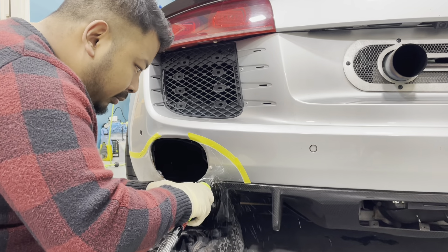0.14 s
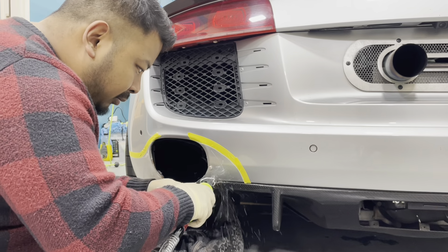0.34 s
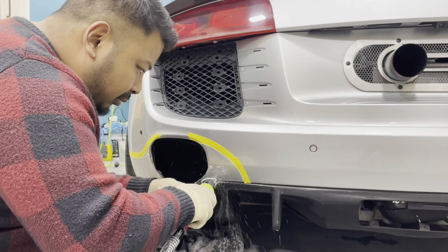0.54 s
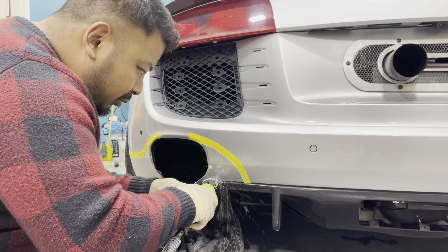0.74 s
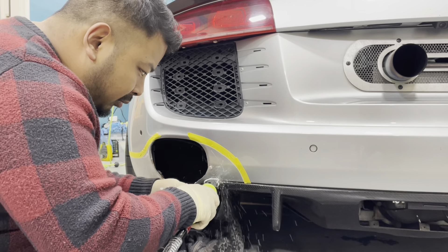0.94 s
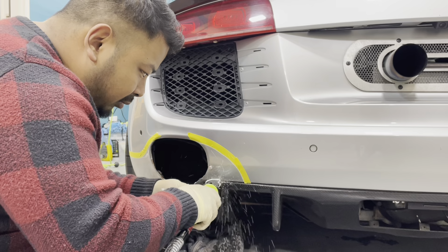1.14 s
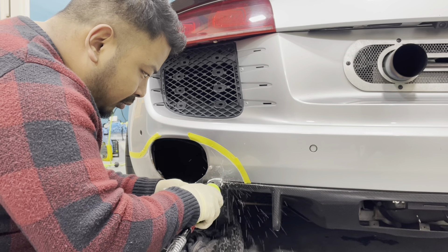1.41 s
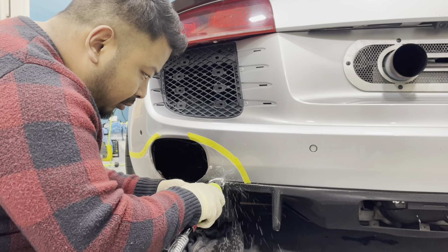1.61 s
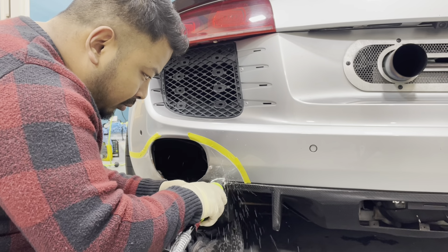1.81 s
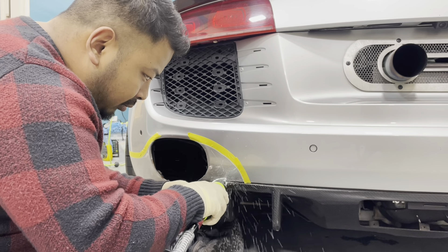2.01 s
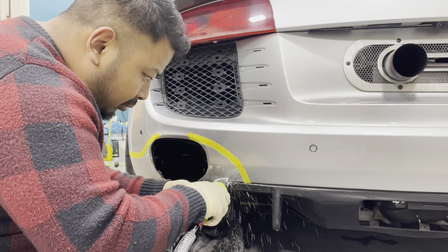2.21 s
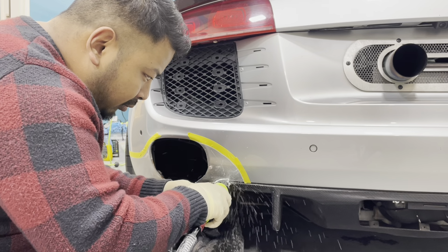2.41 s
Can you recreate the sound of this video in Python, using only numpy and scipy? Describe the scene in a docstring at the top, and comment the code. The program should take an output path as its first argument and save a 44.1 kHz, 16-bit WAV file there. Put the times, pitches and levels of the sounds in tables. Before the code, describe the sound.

A pneumatic saw cuts plastic with a rapid buzz, hissing air and a rough growl.

```python
"""In a workshop, a metre or two away, an air saw cuts a plastic bumper at about 190 strokes a second.
Each stroke hums and makes the panel ring. Pressed hard, the blade bites on every other stroke and
growls an octave lower. Exhaust air and chips hiss, puffing once a stroke. Two microphone openings,
left and right, hear it all with a small lag between them."""
import sys
import numpy as np
from scipy import signal
from scipy.fft import rfft, irfft, next_fast_len
from scipy.io import wavfile
from scipy.ndimage import uniform_filter1d

SR = 44100
rng = np.random.default_rng(int(sys.argv[2]) if len(sys.argv) > 2 else 0)


def dump(signal):
    """Clip the signal to [-1, 1] and save it as 16-bit WAV at the path in sys.argv[1]."""
    limited = np.clip(np.atleast_2d(signal).T, -1, 1)
    pcm = np.round(limited * 32767).astype(np.int16)
    wavfile.write(sys.argv[1], SR, pcm)


N = 112454
TIME = np.arange(N) / SR

# How fast the saw strokes and how loud it hums: t/s, stroke rate/Hz, level/dB
STROKE_HUM = [(0.06, 184.6, -20.9), (0.18, 186.4, -19.8), (0.31, 188.9, -18.5), (0.45, 190.1, -17.5),
              (0.66, 190.9, -18), (0.77, 193.3, -18.9), (1.2, 195.4, -19.5), (1.48, 196.3, -19.6),
              (1.6, 195.5, -20.5), (1.65, 194.2, -20), (1.7, 196.4, -20), (1.75, 193.8, -20),
              (1.83, 195.4, -20), (1.92, 193.1, -19.5), (2.0, 194.5, -20.2), (2.07, 192.6, -19),
              (2.14, 192.9, -19.5), (2.24, 194.3, -20), (2.32, 196.4, -20), (2.38, 194.8, -19.5),
              (2.48, 195.1, -19)]


def undb(db):
    """Turn decibels into a gain."""
    return 10 ** (np.asarray(db) / 20)


def over_time(rows, col=1):
    """Join the points of a table column into a signal over time."""
    rows = np.array(rows, float)
    return np.interp(TIME, rows[:, 0], rows[:, col])


def over_frequency(rows, hz, log=True):
    """Read a table of (frequency, value) at hz."""
    freqs, values = np.array(rows, float).T
    return np.interp(np.log(hz + 1), np.log(freqs + 1), values) if log else np.interp(hz, freqs, values)


def wander(rate_hz, count=1):
    """Rows of smooth random drift, about 1 in size."""
    hold = max(int(SR / rate_hz), 2)
    steps = np.repeat(rng.standard_normal((count, 2000))[:, :N // hold + 1], hold, axis=1)
    return 1.46 * uniform_filter1d(uniform_filter1d(steps, hold), hold)[:, :N]


def filtered(x, gain):
    """Filter x by a gain given for every frequency."""
    size = next_fast_len(N)
    freqs = np.arange(size // 2 + 1) * SR / size
    return irfft(rfft(x, size) * gain(freqs), size)[..., :N]


def panel_shudder(bite, centre_hz=55, level_db=-68):
    """The panel shakes with a faint rumble when the blade bites."""
    rumble = filtered(rng.standard_normal(N), lambda f: np.exp(-(np.log((f + 1) / centre_hz) / .3) ** 2))
    return bite * undb(level_db) * rumble / rumble.std()


def air_sizzle(centre_hz=10040, width_hz=220, level_db=-56, full_at_s=1.27):
    """A thin, high sizzle fades into the air hiss."""
    sizzle = filtered(rng.standard_normal(N), lambda f: np.exp(-((f - centre_hz) / width_hz) ** 2))
    fade_in = np.clip(10 * (TIME - full_at_s) + 1, 0, 1)
    return fade_in * undb(level_db + 2 * wander(10)[0]) * sizzle / sizzle.std()


def air_and_chips(phase, bite, rasp_top_hz=4300):
    """Exhaust air and chips hiss; the treble puffs with each stroke and crackles."""
    # Base tone colour of the hiss: f/Hz, level in each hertz/dB
    spectrum = [(30, -98), (60, -90), (130, -82), (250, -76.5), (500, -84), (1000, -75), (2000, -73),
                (2700, -75), (3400, -77.5), (4200, -74), (7500, -73.5), (10000, -73), (12500, -79),
                (16000, -79.5)]
    # Slow rise and fall of the treble: t/s, change/dB
    treble_swell = [(0, 1.5), (.3, -2), (1., 0.5), (1.5, 0), (2.5, -2)]
    # The blade scrapes as it catches: middle t/s, length/s, lift/dB
    scrapes = [(0.185, 0.29, 3), (2.08, .05, 1), (2.266, 0.045, 1.5), (2.369, 0.042, 2)]
    scrape_db = sum(db * np.exp(-(2 * (TIME - middle) / length) ** 2) for middle, length, db in scrapes)
    rasp_db = 4.5 * bite ** .25  # harder biting, more rasp
    hiss = np.zeros(N)
    for hz in 30 * 2 ** np.arange(0, 9.5, .5):  # bands half an octave apart
        treble = np.clip(hz / 3000, 0, 1)
        puff_db = 2.5 * np.sin(phase + 2 * rng.standard_normal()) + bite * np.sin(phase / 2)
        flicker_db = (1 - treble / 2) * wander(15)[0]
        crackle_db = 1.2 * wander(700)[0]
        db = flicker_db + treble * (puff_db + crackle_db + over_time(treble_swell))
        if hz < rasp_top_hz:
            db += rasp_db + min(hz / 1000, 1) * scrape_db
        hump = lambda f: np.cos(np.pi * np.clip(np.log2((f + 1) / hz), -.5, .5))
        noise = filtered(rng.standard_normal(N), lambda f: hump(f) * undb(over_frequency(spectrum, f)))
        hiss += undb(db) * noise
    return hiss * np.sqrt(SR / 2)


def ringing_db(k):
    """The tone at k times the stroke rate rings up or drops away for a while."""
    # Passing swells and dips: start t/s, length/s, multiple of the stroke rate, change/dB
    swells = [(0, .24, 11, 9), (.3, .25, 21, 7), (.52, .24, 4, -8), (.74, .42, 7, 3), (.5, .22, 24, -11),
              (.7, .62, 17, 5), (.76, .42, 15, 5), (1.2, .4, 15, -7), (1.1, .32, 2, -4), (1.44, .22, 12, 6),
              (1.67, .2, 12, -5), (.55, .13, 11, 5), (2.39, .2, 20, 4), (.3, .2, 23, 4), (.25, .22, 4, 4),
              (.56, .16, 3, -4), (.3, .35, 14, 9), (.68, .2, 16, 6), (.7, .85, 10.5, -8),
              (2.22, .17, 3, -2), (2.07, .32, 10.5, -5), (1.58, .16, 14.5, 10), (1.58, .16, 13.5, 9),
              (2.1, .45, 15, -6), (.28, .25, 16, 7), (2.2, .35, 12, -6), (.72, .45, 20, 4),
              (2.22, .17, 14, -9), (1.3, .3, 21, -5)]
    edge_s = .02
    return sum(db * np.clip(np.minimum(TIME - start, start + length - TIME) / edge_s + .5, 0, 1)
               for start, length, multiple, db in swells if round(2 * multiple) == 2 * k)


def panel_tone(phase, k, db, waver):
    """One tone at k times the stroke rate; its level and timing waver as the panel flexes."""
    level_drift, phase_drift = waver * wander(8, count=2)
    patchy_db = 2.5 * (k > 12) * wander(14)[0]  # high tones come and go
    gain = undb(db + ringing_db(k) + patchy_db) * np.sqrt(2) * np.abs(1 + level_drift)
    offset = (.5 + .25 * k) * rng.standard_normal()  # blurs the sharp pulse of each stroke
    return -gain * np.cos(k * phase + offset + 2 * phase_drift)


def saw_blade(phase, bite):
    """Strokes hum and ring the panel; biting on every other one adds growling tones in between."""
    # How far the blade is sunk in the cut: t/s, depth from 0 to 1
    cut_depth = [(.06, 0.31), (.5, 0.26), (.8, 0.49), (1.05, 0.94), (1.6, 1), (2.48, 0.75)]
    # Extra level at five times the stroke rate: t/s, change/dB
    fifth_lift = [(.06, 4.5), (.3, 0), (.68, -9.5), (.8, -3.5), (1.04, -14), (1.16, -4), (2.1, 0),
                  (2.3, 5.5), (2.48, 0.5)]
    # Base levels, one row per multiple of the stroke rate, from 1:
    # blade shallow/dB, sunk/dB, biting/dB, growl half a multiple lower/dB
    overtones = [(-19, -20, -20, -48.5), (-26.5, -35.5, -35.5, -32), (-23.5, -28.5, -24, -53.5),
                 (-33.5, -34, -35, -39.5), (-31, -27, -32.5, -36.5), (-28, -23.5, -33, -32.5),
                 (-26, -33, -38, -35.5), (-40.5, -36.5, -49, -35), (-27.5, -26, -31.5, -33),
                 (-29.5, -37, -35, -38), (-34.5, -44, -44, -33), (-41.5, -31.5, -31, -38.5),
                 (-48.5, -48.5, -38, -42), (-49, -45, -41.5, -43), (-47, -40.5, -41.5, -41.5),
                 (-42.5, -53, -47, -42.5), (-47, -43, -67, -48), (-50, -45, -57, -49.5),
                 (-50, -48, -61, -52), (-51.5, -43.5, -59, -39), (-47, -45.5, -44.5, -48),
                 (-45, -48, -61, -51), (-43.5, -50.5, -55, -51), (-45, -51.5, -76, -49)]
    depth = np.clip(over_time(cut_depth), 0, 1)
    sound = panel_tone(phase, 1, over_time(STROKE_HUM, col=2), waver=0)
    for k, (shallow_db, sunk_db, biting_db, growl_db) in enumerate(overtones, 1):
        db = shallow_db + (sunk_db - shallow_db) * depth
        db += (biting_db - db) * np.clip(bite, 0, 1) ** 2
        if k == 5:
            db += over_time(fifth_lift)
        if k > 1:
            sound += panel_tone(phase, k, db, waver=.14 + .012 * k)
        growl = bite ** (1 - .026 * k)  # high tones answer sooner to a light bite
        sound += growl * panel_tone(phase, k - .5, growl_db, waver=.12 + .012 * k)
    for step in range(12):  # faint buzz above the table's tones
        k = len(overtones) + 1 + step
        fall_db = .05 * step
        sound += panel_tone(phase, k, -54.5 - fall_db, waver=.69)
        sound += np.sqrt(bite) * panel_tone(phase, k - .5, -56.5 - fall_db, waver=.27)
    return sound


def air_saw(phase, bite):
    """The whole tool at work: blade, hiss and shaking panel."""
    return saw_blade(phase, bite) + air_and_chips(phase, bite) + panel_shudder(bite) + air_sizzle()


def scene():
    """The saw reaches both openings directly; reflected sound has opposite signs left and right."""
    # How hard the blade bites on every other stroke: t/s, strength/dB
    biting = [(.06, -20), (.22, -20), (.36, -30), (.67, -25), (.77, -9), (.805, -23), (.83, -11),
              (.85, -19), (.88, -13), (.91, -32), (.97, -30), (1.04, -6), (1.08, -23), (1.11, -9),
              (1.14, -21), (1.19, -4), (1.24, -19), (1.27, -11), (1.3, -17), (1.34, -12), (1.41, -27),
              (1.53, -21), (1.59, -10), (1.65, -8), (1.69, -13), (1.74, 0), (2.0, 0.5), (2.27, -1.5),
              (2.315, -3), (2.378, -2), (2.388, -18), (2.48, -25)]
    # Share of reflected sound, then its last point in the treble: f/Hz, gain
    reflection = [(60, .03), (1200, .04), (2200, .25), (4500, .4), (6000, .35)]
    reflection_top = (7000, .28)
    # How far the left side runs ahead in the lows and mids: f/Hz, lead/radians
    low_lead = [(0, 0), (780, 0.49), (1980, 0), (2410, 1.06), (3190, 0.46), (4570, 0.24)]
    # The same in the treble: f/Hz, lead/half-turns
    high_lead = [(7000, .93), (8250, 1.07), (10500, 1.93), (11700, 2.07), (13700, 2.93), (15100, 3.07),
                 (16000, 3.3)]
    # How much louder the left side is: f/Hz, left minus right/dB
    balance = [(60, 1), (200, 0.5), (380, 3.5), (700, 5.5), (1290, 2), (2380, -0.5), (4400, 1),
               (8120, -0.5)]
    phase = 2 * np.pi * np.cumsum(over_time(STROKE_HUM)) / SR  # one turn per stroke
    bite = undb(over_time(biting))
    direct = air_saw(phase, bite)
    reflected = filtered(air_saw(phase, bite), lambda f: over_frequency(reflection + [reflection_top], f))
    lead = low_lead + [(hz, np.pi * half_turns) for hz, half_turns in high_lead]
    channels = []
    for side in (.5, -.5):  # left, right
        gain = lambda f: undb(side * over_frequency(balance, f))
        shift = lambda f: np.exp(1j * side * over_frequency(lead, f, log=False))
        channels.append(filtered(direct, lambda f: gain(f) * shift(f)) + np.sign(side) * reflected)
    return np.array(channels)


def record(dry):
    """Cut away the highest treble."""
    top_hz = 16000
    return signal.sosfilt(signal.ellip(12, .2, 80, top_hz, fs=SR, output="sos"), dry)


dry = scene()
out = record(dry)
dump(out)
```